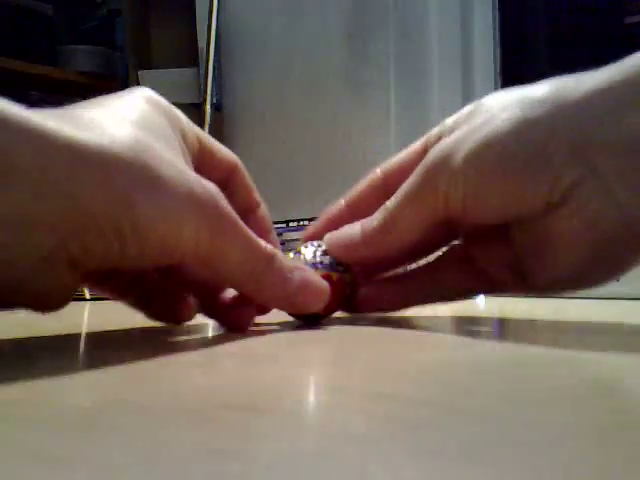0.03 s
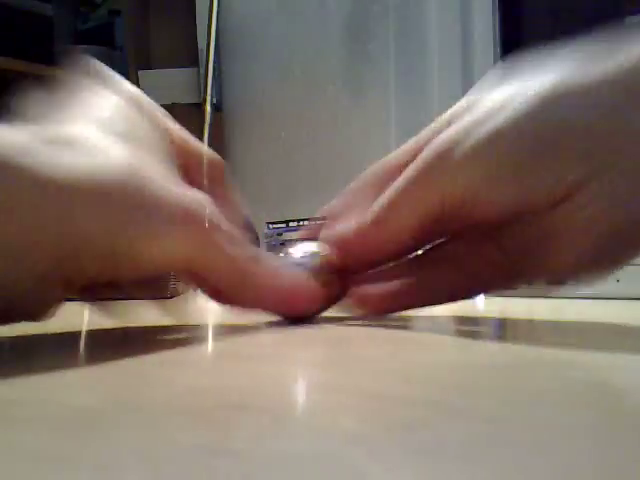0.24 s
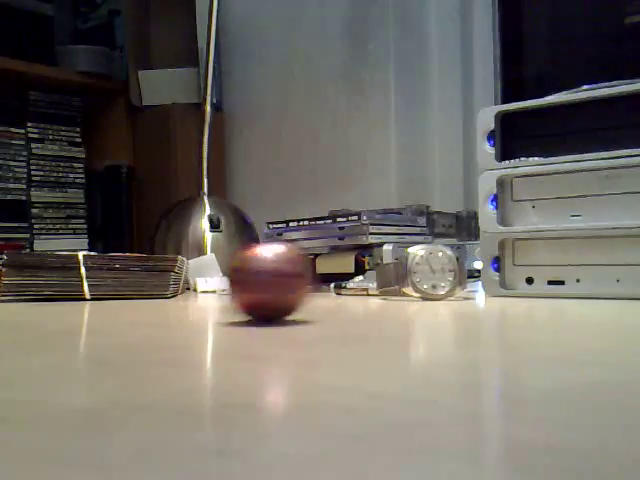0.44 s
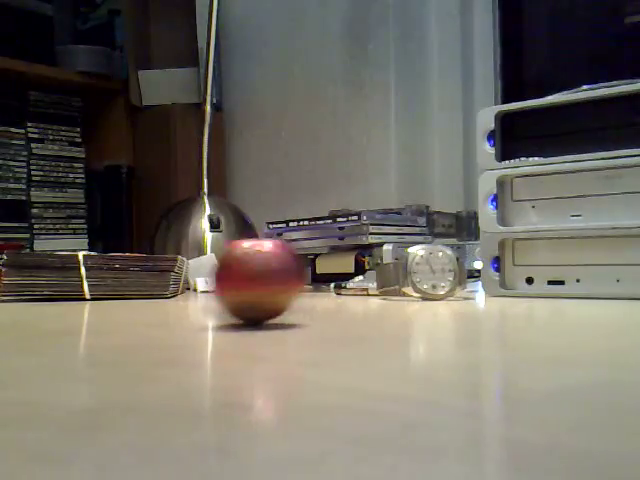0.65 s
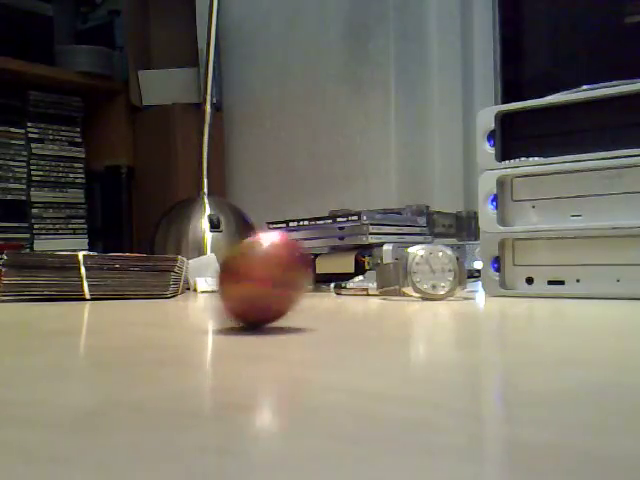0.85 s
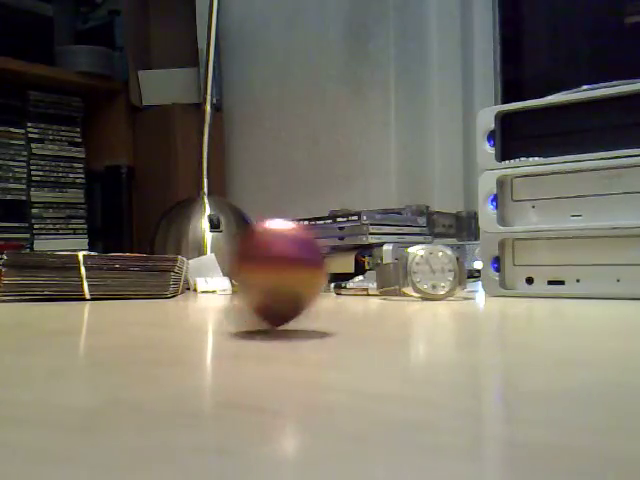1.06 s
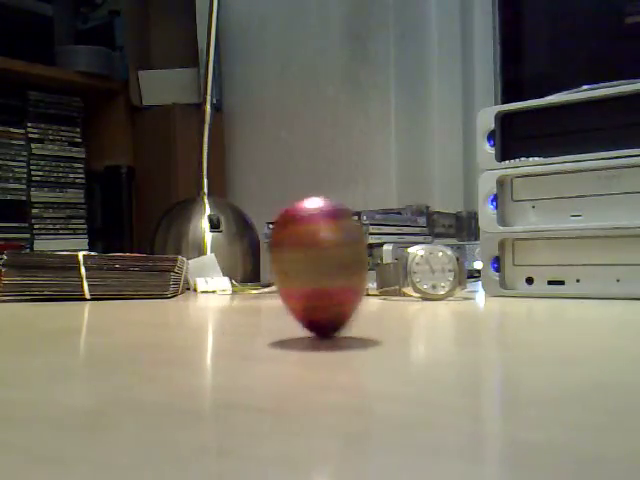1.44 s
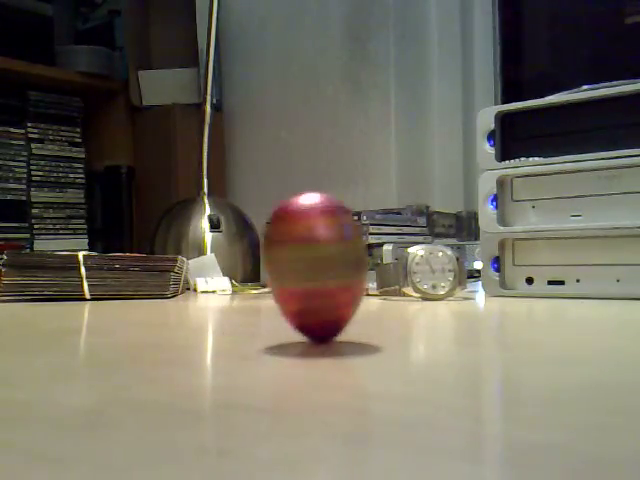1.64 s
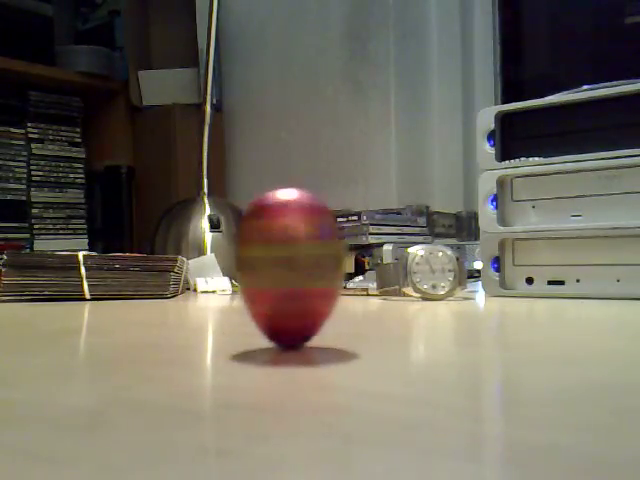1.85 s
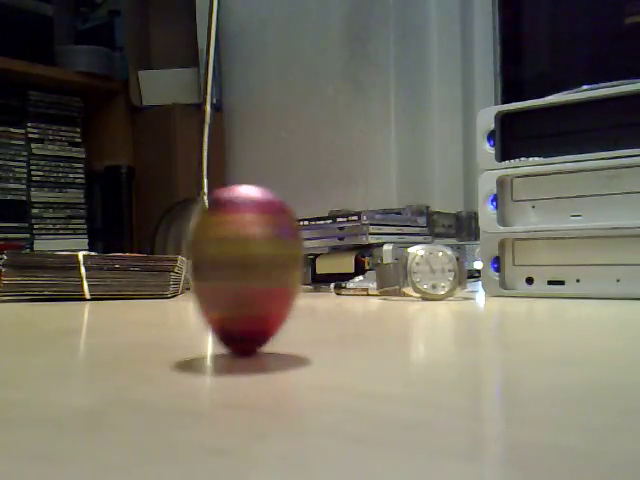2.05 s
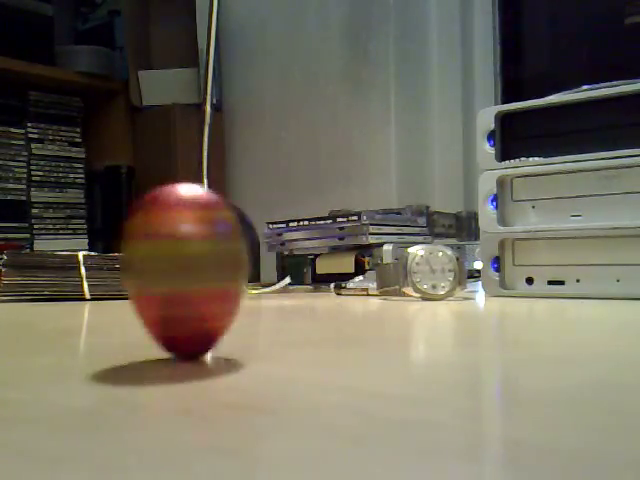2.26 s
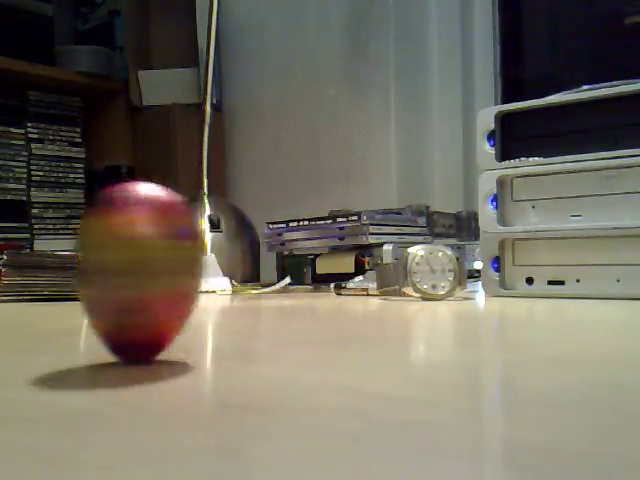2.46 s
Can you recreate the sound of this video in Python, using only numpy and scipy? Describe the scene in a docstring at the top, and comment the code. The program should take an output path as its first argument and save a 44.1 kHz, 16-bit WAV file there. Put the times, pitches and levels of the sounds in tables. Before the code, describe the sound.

A wrapped egg spinning on a tabletop starts with one knock and a fast, uneven rattle, which fades to a soft, low, wobbling whirl. Two short swishes come near the end, over the hum and hiss of a small room.

```python
"""On a table in a small room, a foil-wrapped egg is flicked into a spin. It knocks once, tumbles on
its side with a rattle of dull taps, then rises on its tip and whirls with a faint pulsing murmur.
Each impact crushes the foil, sends a bending wave through the tabletop and excites its modes.
A few airy swishes, likely sleeves, pass over a low hum, a rumble and a hiss that sinks in the rattle."""
import sys
import numpy as np
from scipy import signal
from scipy.fft import rfft, irfft
from scipy.io import wavfile

SR = 44100
rng = np.random.default_rng(int(sys.argv[2]) if len(sys.argv) > 2 else 0)


def unload_audio(sound):
    """Save the sound as a 16-bit wav file, at the path given as the first command line argument."""
    columns = np.transpose(np.atleast_2d(sound))
    # keep every value between -1 and 1, then stretch to whole-number steps
    steps = np.round(np.clip(columns, -1, 1) * 32767)
    wavfile.write(sys.argv[1], SR, steps.astype(np.int16))


N = 110250
T = np.arange(N) / SR
RESPONSE_N = 32768  # samples in an impulse response

# taps of the tumbling egg: start_s, level_db, hardness_db
TAPS = [(.4706, -6.5, -2.5), (.5047, -22, 3), (.5248, -15.5, -8), (.5552, -33.5, -16), (.6154, -11.5, -5),
        (.6221, -17.5, -18), (.6545, -26, 5), (.6701, -8.5, -4), (.6816, -11.5, -6), (.712, -5.5, 2),
        (.7229, -8.5, -9), (.7555, -14.5, -7.5), (.7737, -11, -10.5), (.7795, -13, 0.5), (.798, -6, -5.5),
        (.8158, -9, -10), (.8591, -11, -16), (.8754, -8.5, -2.5), (.895, -11.5, -3), (.9161, -4, -7.5),
        (.9273, -9, 1.5), (.9394, -7, 0.5), (.9618, -7, -10), (.9725, -8, -8), (.9995, -2.5, -2),
        (1.0133, -6.5, 2), (1.0207, -17.5, -12), (1.0352, -7, -2), (1.0446, -11, -4.5), (1.0666, -14, -5),
        (1.0811, -6.5, -2), (1.0851, -6.5, -9), (1.112, -6, -5.5), (1.1377, -7, -1), (1.1624, -5.5, -4.5),
        (1.231, -18, -19), (1.2551, -15.5, -15), (1.281, -30, 1), (1.350, -36.5, 2), (1.4438, -37.5, -12)]
# spectrum of one tap: frequency_hz, gain_db
TAP_SPECTRUM = [(40, -28), (130, -13), (300, -12.5), (600, -9.5), (770, 1.5), (1050, -1.5), (1380, -15.5),
                (2000, -21.5), (4500, -46.5), (8000, -68), (15000, -62)]
# the launching knock and its rebounds: start_s, level_db, hardness_db
KNOCKS = [(.2188, -0.5, 0.5), (.2228, -10, -12.5), (.2262, -4, -2.5)]
# spectrum of the knock: frequency_hz, gain_db
KNOCK_SPECTRUM = [(35, -10.5), (265, -8), (370, 3), (540, -13), (830, 3), (1170, -1.5), (1550, -7.5),
                  (2000, -20.5), (2950, -23), (4300, -40), (10000, -53.5)]
# reflections from the table's edges: delay_s, gain_db, cutoff_hz
EDGE_REFLECTIONS = [(.0039, -7.5, 1004), (.007, -12, 1900)]
# modes of the tabletop: pitch_hz, gain_db
TABLE_MODES = [(249, -6), (323, 0), (348, -3), (440, -5), (530, -7.5), (712, -3.5), (774, -5.5),
               (1005, -3.5), (1094, -11), (1303, -9), (1590, -7)]
# envelope of the rolling contact: time_s, level_db
ROLL_ENVELOPE = [(0, -60.5), (.41, -45), (.46, -29), (.6, -35.5), (.7, -31), (1.17, -32.5), (1.28, -35.5),
                 (1.35, -43), (1.54, -49), (1.65, -63), (2.17, -48), (2.5, -59)]
# spectrum of the rolling contact: frequency_hz, gain_db
ROLL_SPECTRUM = [(40, -33.5), (100, -8), (200, 1.5), (350, -4), (520, -2.5), (800, -8.5), (1250, -13),
                 (2300, -23), (15000, -62)]
# scuffs of foil on the table: centre_s, half_width_s, level_db
SCUFFS = [(0.457, 0.021, -40), (1.399, 0.036, -53)]
# spectrum of a scuff: frequency_hz, gain_db
SCUFF_SPECTRUM = [(300, 2), (1100, 4.5), (1850, 3), (2450, 3), (3100, -1.5), (5500, -10), (9000, -29)]
# airy swishes: start_s, attack_s, hold_s, level_db
SWISHES = [(0.439, 0.014, 0.0054, -47), (0.541, .03, .006, -58), (1.058, .005, .006, -57),
           (1.182, 0.022, 0.0045, -53.5), (1.289, 0.018, .005, -55.5), (1.87, 0.007, 0.027, -37),
           (1.956, 0.0088, 0.027, -36.5)]
# spectrum of a swish: frequency_hz, gain_db
SWISH_SPECTRUM = [(300, -25.5), (1000, -4.5), (2100, 5.5), (3000, -2), (6000, -3), (9000, -6.5),
                  (10800, -0.5), (12700, 0.5), (15500, -8)]
# partials of the hum: pitch_hz, level_db
HUM_PARTIALS = [(48.4, -56), (323, -48), (969, -67.5)]
# spectrum of the room's rumble: frequency_hz, gain_db
RUMBLE_SPECTRUM = [(20, -5), (45, 4.5), (70, -5), (120, 6.5), (260, 2), (600, -17), (1500, -70)]
# spectrum of the hiss: frequency_hz, gain_db
HISS_SPECTRUM = [(700, 4.5), (1600, -2.5), (3000, -8), (5000, -14), (8000, -17.5), (12000, -17),
                 (16000, -14.5)]
# envelope of the hiss: time_s, level_db
HISS_ENVELOPE = [(0, -51.5), (.21, -51.5), (.25, -53.5), (.42, -52), (.65, -55), (1.2, -57), (1.6, -58.5),
                 (1.85, -49), (2.1, -47.5), (2.5, -49)]


def egg_impacts(blows, spectrum, ring_db, room_db, room_t60_s):
    """Dispersion: each blow launches a bending wave whose treble arrives first; echoes and modes follow."""
    travel_s, pivot_hz = 0.001573, 904  # travel time at 1 kHz; hardness tilts the sound about the pivot
    pitch_spread = 0.049  # the thud's pitch varies with the spot on the shell that lands
    hz = np.fft.rfftfreq(RESPONSE_N, 1 / SR)
    thud = minimum_phase(spectrum)
    bending = np.exp(-4j * np.pi * travel_s * np.sqrt(1000 * hz))
    bending /= np.abs(irfft(thud * bending)).max()
    edges = sum(undb(db) * np.exp(-2j * np.pi * hz * delay_s) / (1 + (hz / cutoff_hz) ** 4)
                for delay_s, db, cutoff_hz in EDGE_REFLECTIONS)
    shared_tail = rfft(room_tail(room_t60_s))
    tilt = np.clip(np.log((hz + 1) / pivot_hz), -.5, 1)
    out = np.zeros(N + RESPONSE_N)
    for start_s, level_db, hardness_db in blows:
        detune = np.exp(pitch_spread * rng.standard_normal())
        wave = bending * np.interp(hz * detune, hz, thud)
        tail = (shared_tail + rfft(room_tail(room_t60_s))) / np.sqrt(2)  # echoes shift as the egg wanders
        paths = foil_crunch(hz) + edges + undb(room_db) * tail
        ring = undb(ring_db) * rfft(table_ring())
        blow = irfft(undb(hardness_db * tilt) * (wave * paths + ring))
        at = int((start_s - travel_s / 2) * SR)  # the treble front arrives at the start time
        out[at:at + RESPONSE_N] += undb(level_db) * blow
    return out[:N]


def table_ring(t60_s=0.14, attack_s=0.0016):
    """Free vibration: the tabletop's damped modes ring with phases that depend on where the egg lands."""
    t = T[:RESPONSE_N]
    modes = sum(undb(db) * np.sin(2 * np.pi * (hz * t + rng.random())) for hz, db in TABLE_MODES)
    return modes * decay(t, t60_s) * (1 - np.exp(-t / attack_s))


def foil_crunch(hz, crossover_hz=3040, t60_s=0.029, gain_db=2):
    """Crushing of foil: a noise burst replaces the treble of the clean contact's spectrum."""
    burst = rng.standard_normal(RESPONSE_N) * decay(T[:RESPONSE_N], t60_s)
    crush = undb(gain_db) * rfft(burst) / np.sqrt(np.sum(burst ** 2))
    treble_share = hz ** 6 / (hz ** 6 + crossover_hz ** 6)
    return np.sqrt(1 - treble_share) + np.sqrt(treble_share) * crush


def egg_rolling(bumps_per_s=2300, ring_db=-38):
    """Roughness excitation: foil creases drive the table's modes; upright, the egg only murmurs."""
    mid_rise_s, rise_s, murmur_cutoff_hz = 1.47, 0.32, 650
    wobble_hz, wobble_db, crest_s = 9.08, 3.5, 1.545
    bumps = clicks(bumps_per_s)
    ringing = coloured(bumps + undb(ring_db) * convolve(bumps, table_ring()), ROLL_SPECTRUM)
    wobble = undb(wobble_db * np.cos(2 * np.pi * wobble_hz * (T - crest_s)))
    murmur = unit_rms(lowpass(coloured(bumps, ROLL_SPECTRUM), murmur_cutoff_hz)) * wobble
    upright = np.clip((T - mid_rise_s) / rise_s + .5, 0, 1)
    return (np.sqrt(1 - upright) * ringing + np.sqrt(upright) * murmur) * envelope(ROLL_ENVELOPE)


def foil_scuffs(slips_per_s=4500):
    """Stick-slip friction: the foil catches as the egg leaves the fingers and as it rises on its tip."""
    level = sum(undb(db) * np.exp(-((T - centre_s) / half_s) ** 2) for centre_s, half_s, db in SCUFFS)
    return coloured(clicks(slips_per_s), SCUFF_SPECTRUM) * level


def swishes(release_t60_s=0.15, room_db=-0.5):
    """Friction noise: short airy brushes, likely of sleeves, with a duller tail from the room."""
    level = np.zeros(N)
    for start_s, attack_s, hold_s, db in SWISHES:
        attack = np.clip((T - start_s) / attack_s, 0, 1)
        release = decay(np.maximum(T - start_s - attack_s - hold_s, 0), release_t60_s)
        level += undb(db) * attack * release
    direct = noise(SWISH_SPECTRUM) * level
    tail = lowpass(convolve(direct, room_tail(t60_s=0.44)), cutoff_hz=4000)
    return direct + undb(room_db) * tail


def room_tail(t60_s, low_cut_hz=176, build_s=0.00033):
    """Reverberation: a diffuse tail of unit energy; the small room holds no deep bass."""
    t = T[:RESPONSE_N]
    tail = rng.standard_normal(RESPONSE_N) * decay(t, t60_s) * (1 - np.exp(-t / build_s))
    tail = signal.sosfilt(signal.butter(2, low_cut_hz, "high", fs=SR, output="sos"), tail)
    return tail / np.sqrt(np.sum(tail ** 2))


def background(rumble_db=-48.5):
    """Tonal and broadband noise: a hum as of a computer, room rumble, and hiss that sinks and returns."""
    hum = sum(np.sqrt(2) * undb(db) * np.sin(2 * np.pi * (hz * T + rng.random()))
              for hz, db in HUM_PARTIALS)
    rumble = undb(rumble_db) * noise(RUMBLE_SPECTRUM)
    hiss = envelope(HISS_ENVELOPE) * noise(HISS_SPECTRUM)
    return hum + rumble + hiss


def undb(db):
    return 10 ** (np.asarray(db) / 20)


def unit_rms(x):
    return x / np.sqrt(np.mean(x ** 2))


def decay(t, t60_s):
    return np.exp(-np.log(1000) * t / t60_s)


def envelope(points):
    return undb(np.interp(T, *np.array(points).T))


def gains(spectrum, size):
    hz, db = np.array(spectrum).T
    return undb(np.interp(np.log(np.fft.rfftfreq(size, 1 / SR) + 1), np.log(hz), db))


def minimum_phase(spectrum):
    """Causality: folding the cepstrum gives a frequency response with no sound ahead of the blow."""
    cepstrum = irfft(np.log(gains(spectrum, RESPONSE_N)))
    return np.exp(rfft(2 * cepstrum[:RESPONSE_N // 2], RESPONSE_N) - cepstrum[0])


def coloured(x, spectrum):
    """Linear filtering: the signal weighted by a spectrum, at unit RMS."""
    return unit_rms(irfft(rfft(x) * gains(spectrum, N), N))


def noise(spectrum):
    return coloured(rng.standard_normal(N), spectrum)


def clicks(per_s):
    """Poisson process: independent clicks, mostly small, a few large."""
    return (rng.random(N) < per_s / SR) * rng.laplace(size=N)


def lowpass(x, cutoff_hz):
    return signal.sosfilt(signal.butter(2, cutoff_hz, fs=SR, output="sos"), x)


def convolve(x, response):
    return signal.fftconvolve(x, response)[:N]


def scene():
    """Superposition: knock, rattle, spin and the sounds of the room add in one channel."""
    knock = egg_impacts(KNOCKS, KNOCK_SPECTRUM, ring_db=-17.5, room_db=-1.5, room_t60_s=0.32)
    spin = egg_rolling() + foil_scuffs()
    surroundings = swishes() + background()
    rattle = egg_impacts(TAPS, TAP_SPECTRUM, ring_db=-24.5, room_db=-6, room_t60_s=0.22)
    return (knock + rattle + spin + surroundings)[None]


def record(dry):
    """Soft saturation and band limiting: the loudest peaks are rounded and the top treble is cut."""
    ceiling, cutoff_hz = 0.78, 16000
    rounded = dry / (1 + (dry / ceiling) ** 4) ** .25
    return signal.sosfilt(signal.ellip(12, .1, 90, cutoff_hz, fs=SR, output="sos"), rounded)


dry = scene()
out = record(dry)
unload_audio(out)
```